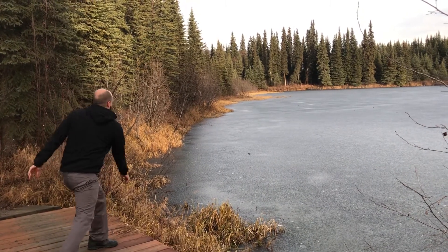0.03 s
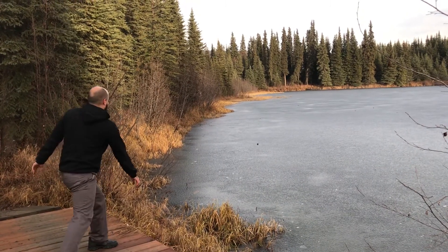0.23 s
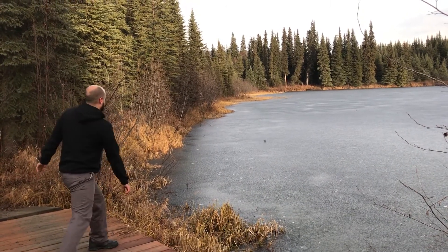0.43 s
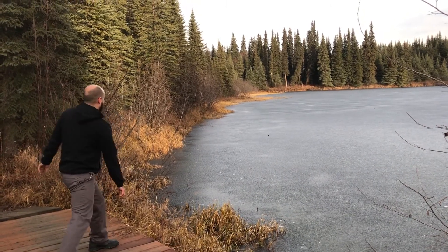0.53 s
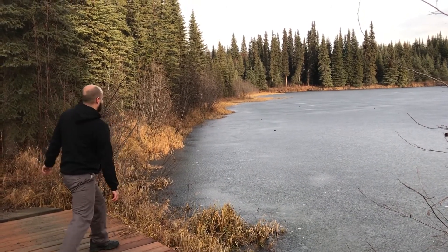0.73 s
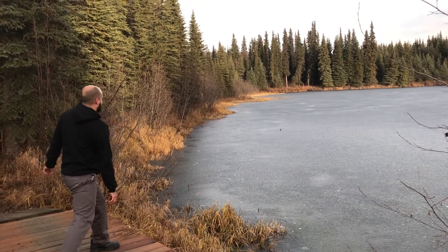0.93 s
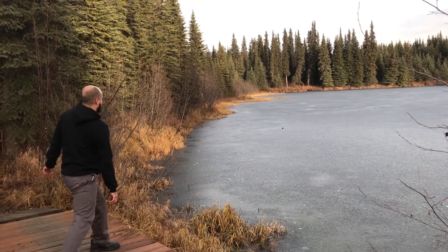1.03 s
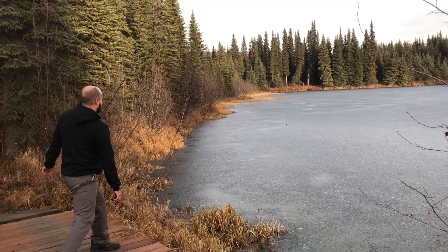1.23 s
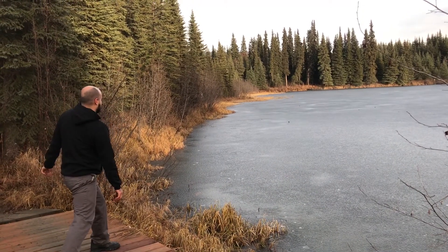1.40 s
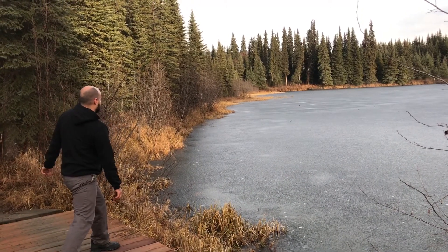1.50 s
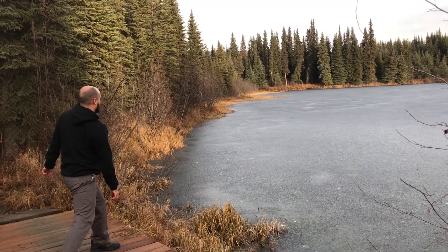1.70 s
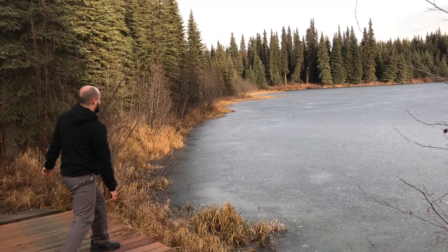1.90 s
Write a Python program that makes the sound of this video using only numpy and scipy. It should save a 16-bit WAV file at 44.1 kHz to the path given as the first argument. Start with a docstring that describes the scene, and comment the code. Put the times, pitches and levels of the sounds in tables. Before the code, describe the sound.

Quick descending chirps and clicks of a stone bouncing away over lake ice.

```python
"""A frozen lake with a wooded shore: a thrown rock skips eight times across the ice, moving away.
Each blow sends a bending wave through the ice. Its treble outruns its bass, so a falling chirp
comes first, and ends when the click of the blow arrives through the air, with a dull thud.
The shore echoes and the ice sheet rings on, over a faint hush of air."""
import sys
import numpy as np
from scipy import signal
from scipy.fft import rfft, irfft
from scipy.io import wavfile

SR = 44100
rng = np.random.default_rng(int(sys.argv[2]) if len(sys.argv) > 2 else 0)


def store_pcm(level_fs):
    """Save levels as 16-bit WAV."""
    pcm = np.round(np.clip(level_fs, -1, 1) * 32767).astype(np.int16)
    wavfile.write(sys.argv[1], SR, np.atleast_2d(pcm).T)


N = 85995


def amp(db):
    """Turns decibels into a number to multiply by."""
    return 10 ** (np.asarray(db) / 20)


def unit(x):
    """Scales a sound to an average (rms) level of 1."""
    return x / np.sqrt(np.mean(x ** 2) + 1e-20)


def read(points, hz):
    """Looks up a table at any pitch, sliding between its rows."""
    pitches, values = np.transpose(points)
    return np.interp(np.log(hz + 1), np.log(pitches + 1), values)


def add(mix, start_s, sound):
    """Mixes a sound in at start_s."""
    at = round(start_s * SR)
    sound = sound[max(-at, 0):]
    part = mix[max(at, 0):][:len(sound)]
    part += sound[:len(part)]


def noise(colour, size):
    """Noise whose colour table says how strong each pitch is next to the others."""
    hz = np.fft.rfftfreq(size, 1 / SR)
    phases = np.exp(2j * np.pi * rng.random(len(hz)))
    return unit(irfft(amp(read(colour, hz)) * phases, size))


def whistle(hz, width_hz):
    """A narrow band of noise that follows the pitch curve hz."""
    r = np.exp(-np.pi * width_hz / SR)
    hiss = rng.standard_normal(len(hz)) + 1j * rng.standard_normal(len(hz))
    waver = signal.lfilter([1], [1, -2 * r, r * r], hiss)
    return unit((waver * np.exp(2j * np.pi * np.cumsum(hz) / SR)).real)


# The colour of the still air: pitch_hz, level_db
AIR_COLOUR = [(15, -69), (25, -18), (59, -2), (114, -12), (200, -5), (301, -8), (476, -15.5), (695, -6.5),
              (753, -8), (862, 0), (1160, -9), (2100, -21), (4860, -33), (8820, -36.5), (10400, -38),
              (14700, -35), (16000, -34)]
def still_air(level_db=-59.5):
    """A faint, steady hush."""
    return amp(level_db) * noise(AIR_COLOUR, N)


# How the ice's own note swells and fades: time_s, level_db
SINGING_LEVELS = [(0, -52), (.03, -51.5), (.09, -52.5), (.16, -60.5), (.5, -61.5), (.75, -57), (1, -68.5),
                  (1.95, -74.5)]
def singing_ice(pitch_hz=737):
    """The ice sheet sings faintly at its own pitch."""
    level_db = np.interp(np.arange(N) / SR, *np.transpose(SINGING_LEVELS))
    return amp(level_db) * whistle(np.full(N, pitch_hz), width_hz=72)


# The colour of the echo: pitch_hz, level_db
ECHO_COLOUR = [(200, -8.5), (480, -4), (680, 7), (950, -9.5), (1500, -9), (3000, -16.5), (5000, -9.5),
               (9000, -6), (15000, -4)]
# How long the near echo takes to fade by 60 dB: pitch_hz, fade_s
ECHO_FADES = [(200, 0.69), (900, 0.12), (2000, 0.46), (5000, 0.44), (15000, 0.17)]
def shore_echo(sound, far_db=-21.5, far_fade_s=1.0, dip_hz=1040, dip_db=-2):
    """Reeds and trees scatter the sound back: a near echo and a long faint one."""
    hz, t, hiss = signal.stft(rng.standard_normal(SR), SR, nperseg=256)
    fade_s = read(ECHO_FADES, hz)[:, None]
    near = np.exp(-np.log(1000) * t / fade_s) / np.sqrt(fade_s)
    far = amp(far_db) * np.exp(-np.log(1000) * t / far_fade_s)
    colour = amp(read(ECHO_COLOUR, hz))[:, None]
    tail = signal.istft(hiss * np.hypot(near, far) * colour, SR, nperseg=256)[1]
    echo = signal.fftconvolve(sound, tail * np.sqrt(2 * np.log(1000) / SR))[:N]
    # The shore returns less of the pitches around dip_hz.
    hz = np.fft.rfftfreq(2 * N, 1 / SR)
    dip = amp(dip_db * np.exp(-(10 * np.log10(hz / dip_hz + 1e-9)) ** 2))
    return irfft(rfft(echo, 2 * N) * dip)[:N]


# The rock's skips, timed as heard through the air. They also drive the thuds and chirps:
# arrival_s, distance_m, end_pitch_hz, chirp_levels_db (one per CHIRP_PITCHES), thud_db
SKIPS = [(.2101, 10.1, 927.3, (-26.5, -22.5, -42.5, -34.5, -35), -39.5),
         (.6061, 14.76, 900, (-17.5, -27, -30, -16.5, -27), -43),
         (1.0308, 17.6, 854.3, (-35, -38, -42.5, -36.5, -48.5), -54.5),
         (1.2027, 20, 858, (-48, -41.5, -40, -37, -43.5), -59.5),
         (1.3117, 19.7, 828, (-42, -48.5, -43.5, -44.5, -45), -62.5),
         (1.4588, 20.5, 820, (-44.5, -46, -40.5, -49, -68), -57),
         (1.6622, 22.8, 819.5, (-51, -53.5, -57.5, -52, -55.5), -59.5),
         (1.8045, 24.7, 818.5, (-46, -39.5, -52, -47.5, -46), -56)]
def ringing_ice(gain_db=-19.5, rise_s=0.0016, fade_s=0.61, sag_s=0.06, rest_hz=760.6):
    """Each skip leaves the sheet ringing, sagging from the chirp's last pitch toward rest_hz."""
    out, t = np.zeros(N), np.arange(SR) / SR
    shape = (1 - np.exp(-t / rise_s)) * np.exp(-np.log(1000) * t / fade_s)
    for arrival_s, _, end_hz, levels_db, _ in SKIPS:
        hz = rest_hz + (end_hz - rest_hz) * np.exp(-t / sag_s)
        add(out, arrival_s, amp(levels_db[0] + gain_db) * shape * whistle(hz, width_hz=193))
    return out


# The colour of a thud: pitch_hz, level_db
THUD_COLOUR = [(30, -25), (80, -16.5), (170, -3), (230, -2.5), (300, 5), (420, -9.5), (650, -7.5),
               (900, -18), (2000, -54.5)]
def thuds(rise_s=0.006, fall_s=0.036, early_s=0.004):
    """Each skip makes a dull knock that peaks just behind its click."""
    out, t = np.zeros(N), np.arange(SR // 2) / SR
    shape = np.minimum(t / rise_s, 1) * np.exp(-np.maximum(t - rise_s, 0) / fall_s)
    for arrival_s, *_, level_db in SKIPS:
        add(out, arrival_s - early_s, amp(level_db) * shape * noise(THUD_COLOUR, len(t)))
    return out


# The tumbling rock touches up to three times a skip: arrival_s, chirp_gain_db, click_db
TOUCHES = [(.2101, 10.5, -23), (.21117, 5.5, -29.5), (.6061, 0.5, -24), (.6165, -15, -55),
           (1.0308, 3.5, -32), (1.0318, -22, -32.5), (1.0358, -0.5, -35.5), (1.1932, -20, -48),
           (1.2027, 0.5, -40.5), (1.2036, -50, -49), (1.3117, -0.5, -42), (1.3127, -47, -46.5),
           (1.4588, 1, -41.5), (1.4655, -21, -65), (1.6566, -1, -61), (1.6622, 1, -49.5),
           (1.6660, 5, -44.5), (1.8045, -2, -43.5)]
# Small lone ticks, perhaps chips of ice landing: arrival_s, level_db
TICKS = [(.400, -53.5), (0.714, -57), (.798, -52)]
# The colour of a click: pitch_hz, level_db
CLICK_COLOUR = [(100, 3), (400, 7), (1000, 14), (2500, 7.5), (5000, -2.5), (8000, -4), (12000, -4.5),
                (16000, 2.5)]
def clicks(fall_s=0.00062):
    """Stone hitting ice, heard through the air, and a few lone ticks."""
    out, t = np.zeros(N), np.arange(SR // 100) / SR
    for arrival_s, *_, level_db in TOUCHES + TICKS:
        click = noise(CLICK_COLOUR, len(t)) * np.exp(-t / fall_s)
        add(out, arrival_s - fall_s / 2, amp(level_db) * click)
    return out


# Bursts of fizz: start_s, level_db, length_s
FIZZ_BURSTS = [(0.1836, -49.5, 0.036), (0.19, -33.5, 0.0087), (0.5668, -41, 0.0066), (0.572, -46.5, 0.011),
               (0.578, -46, 0.0063), (0.99, -48, 0.016), (1.153, -50.5, .006), (1.267, -49.5, 0.0073),
               (1.413, -48, 0.0069), (1.602, -61, 0.004), (1.748, -55, 0.0054)]
# The colour of the fizz: pitch_hz, level_db
FIZZ_COLOUR = [(500, -41), (1500, 4.5), (2500, 16), (3500, 9.5), (4400, -7.5), (6300, -8.5), (8000, -21),
               (16000, -13)]
def fast_wave_fizz():
    """The fast waves in the ice reach the shore first, as a fizz near the top of each chirp."""
    out, t = np.zeros(N), np.arange(SR // 10) / SR
    for start_s, level_db, length_s in FIZZ_BURSTS:
        shape = np.exp(-(t / length_s) ** 2)
        add(out, start_s, amp(level_db) * shape * noise(FIZZ_COLOUR, len(t)))
    return out


# Notes that linger in the ice: pitch_hz, width_hz (wider dies sooner), level_db
GLASSY_NOTES = [(1704, 210, -21), (2710, 190, -9.5), (3640, 340, -11.5)]
def add_glassy_notes(chirps):
    """A chirp sets off a few short notes as it sweeps past their pitches."""
    t = np.arange(SR // 20) / SR
    notes = np.zeros(len(t))
    for hz, width_hz, level_db in GLASSY_NOTES:
        fade = 2 * np.pi * width_hz / SR * np.exp(-np.pi * width_hz * t)
        notes += amp(level_db) * fade * np.sin(2 * np.pi * hz * t)
    return chirps + signal.fftconvolve(chirps, notes)[:N]


def add_smear(chirps, gain_db=-3.5, fall_s=0.0044, above_hz=1490):
    """Flaws in the ice scatter the treble and smear each chirp."""
    t = np.arange(SR // 10) / SR
    flaws = rng.standard_normal(len(t)) * np.sqrt(t) * np.exp(-t / fall_s)
    treble = signal.sosfilt(signal.butter(2, above_hz, "high", fs=SR, output="sos"), chirps)
    return chirps + amp(gain_db) * signal.fftconvolve(treble, flaws / np.linalg.norm(flaws))[:N]


# The five points where a chirp's levels are set: pitch_hz
CHIRP_PITCHES = (873, 1030, 1222, 1576, 3120)
# A chirp's weak top end: pitch_hz, level_db (added to the last of its five levels)
CHIRP_TOP = [(4400, -16), (6500, -19), (12000, -55)]
def chirp(end_s, distance_m, end_hz, levels_db):
    """A bending wave, treble first: a tone that falls fast, then slowly. Gives start_s and sound."""
    air_m_per_s, fastest_wave_m_per_s = 343, 2300
    floor_hz, bend, release_s = 737, 1.6, 0.0016
    dip_hz, dip_db = 2060, -10
    lump_db, lumps_per_octave = 1.6, 8
    lead_s = distance_m / air_m_per_s - distance_m / fastest_wave_m_per_s
    t = np.arange(round((end_s - lead_s) * SR) + 2, round((end_s + 10 * release_s) * SR)) / SR
    progress = np.maximum(1 + (t - end_s) / lead_s, 1 / SR)  # reaches 1 at end_s
    hz = np.minimum(floor_hz + (end_hz - floor_hz) * progress ** -bend, SR / 2)
    turns = np.cumsum(hz) / SR
    turns -= np.interp(end_s, t, turns)
    mid_db, high_db = levels_db[-2:]
    colour = [*zip(CHIRP_PITCHES, levels_db), (dip_hz, (mid_db + high_db) / 2 + dip_db)]
    colour += [(pitch_hz, high_db + db) for pitch_hz, db in CHIRP_TOP]
    # The level wobbles at random on the way down.
    octaves = -bend * np.log2(progress)
    lumps = np.interp(lumps_per_octave * octaves, np.arange(80), rng.standard_normal(80))
    level = amp(read(sorted(colour), hz) + lump_db * lumps)
    release = np.exp(-np.maximum(t - end_s, 0) / release_s)
    return t[0], level * release * np.cos(2 * np.pi * turns)


# Faint chirps with no click: end_s, level_db
FAINT_CHIRPS = [(.084, -55), (.100, -57), (.136, -59), (.181, -64), (.206, -56.5), (.447, -57)]
# Their colour at each of CHIRP_PITCHES: level_db
FAINT_COLOUR = (-6.5, -2.5, -3, -2, -7.5)
def ice_chirps():
    """Each touch bends the ice and sends out a chirp, shaped by its skip; faint ones join in."""
    out = np.zeros(N)
    for arrival_s, gain_db, _ in TOUCHES:
        _, distance_m, end_hz, levels_db, _ = min(SKIPS, key=lambda skip: abs(skip[0] - arrival_s))
        start_s, wave = chirp(arrival_s, distance_m, end_hz, levels_db)
        add(out, start_s, amp(gain_db) * wave)
    for end_s, level_db in FAINT_CHIRPS:
        levels_db = level_db + np.array(FAINT_COLOUR)
        add(out, *chirp(end_s, distance_m=40, end_hz=810, levels_db=levels_db))
    return out


def scene():
    """Chirps, then clicks and thuds, with their echo, over the singing ice and still air."""
    chirps = add_glassy_notes(add_smear(ice_chirps())) + fast_wave_fizz()
    blows = clicks() + thuds()
    echo = shore_echo(amp(-1.5) * chirps + blows)  # less of the chirps reaches the trees
    return (chirps + blows + echo + singing_ice() + ringing_ice() + still_air())[None]


def record(dry, top_hz=15900):
    """Cuts off the very highest treble."""
    low_pass = signal.firwin(511, top_hz, window=("kaiser", 9), fs=SR)
    return signal.oaconvolve(dry, low_pass[None], "same")


dry = scene()
out = record(dry)
store_pcm(out)
```